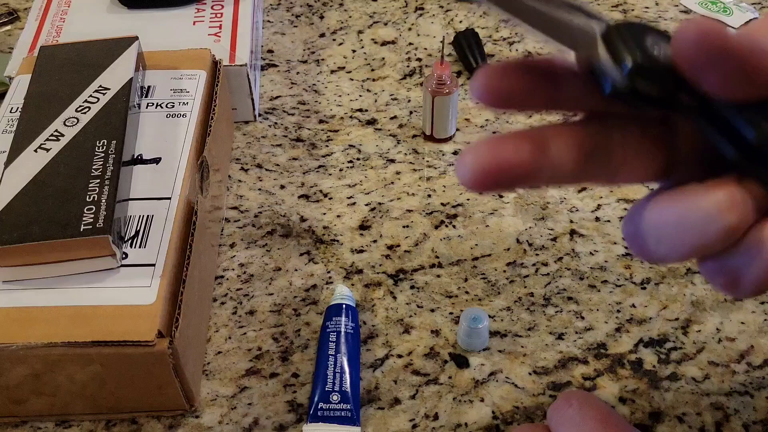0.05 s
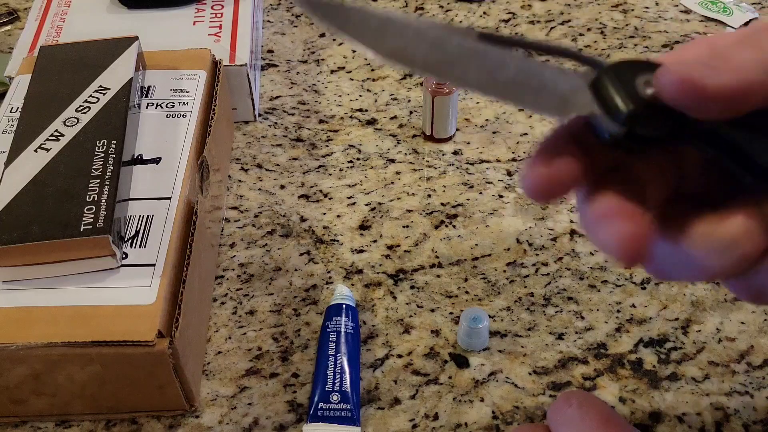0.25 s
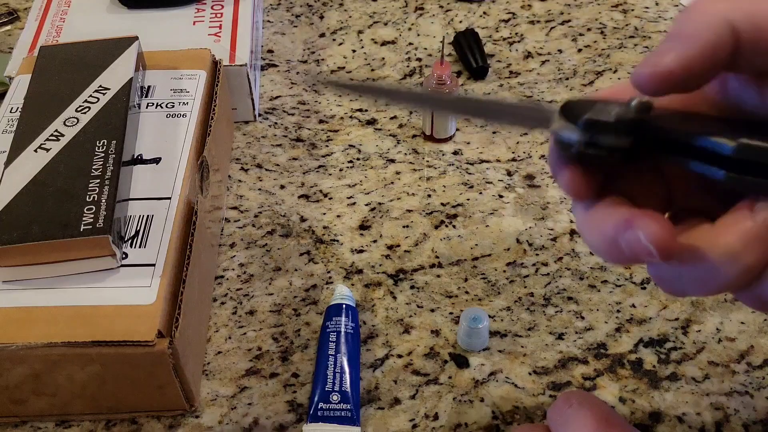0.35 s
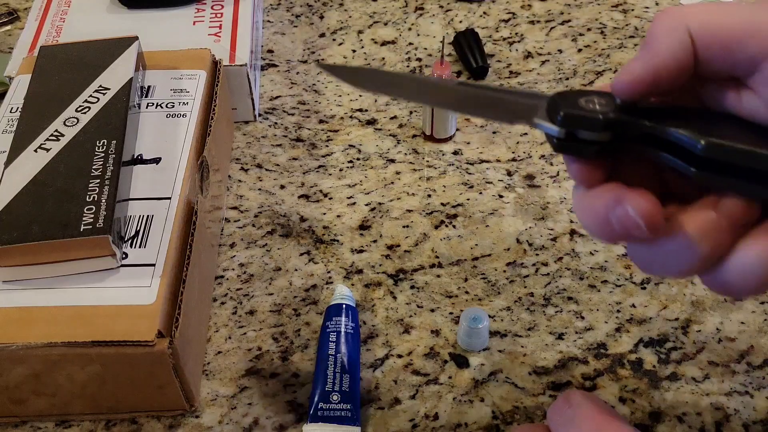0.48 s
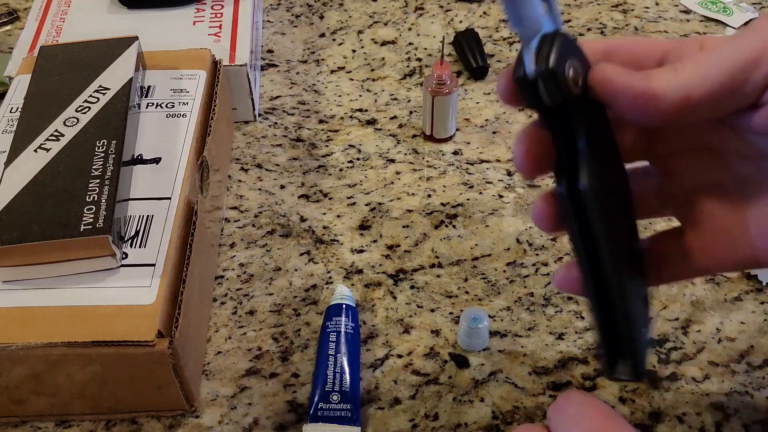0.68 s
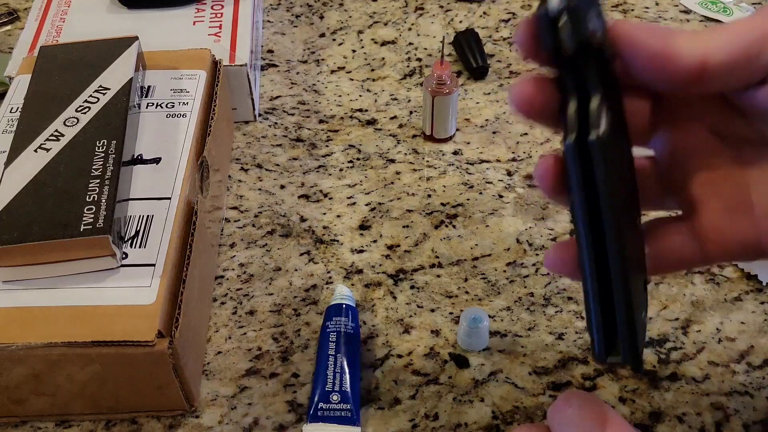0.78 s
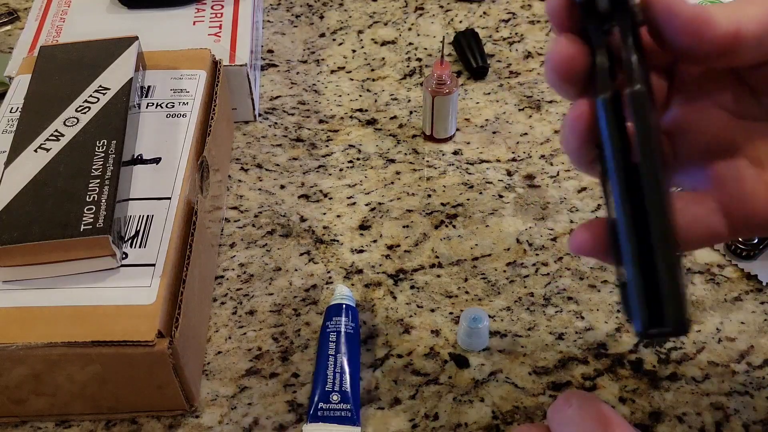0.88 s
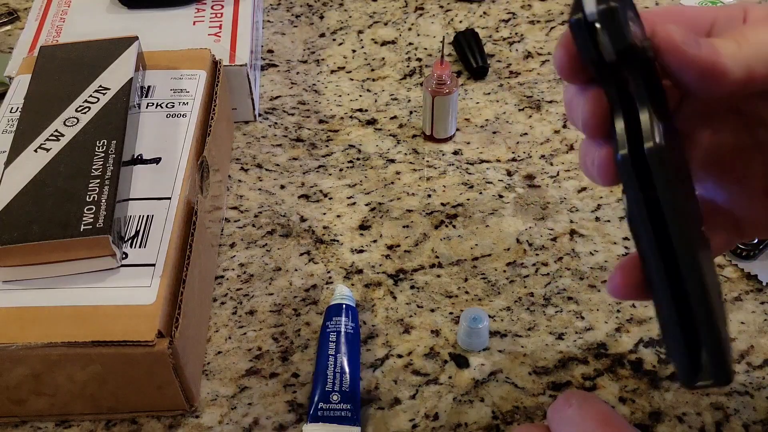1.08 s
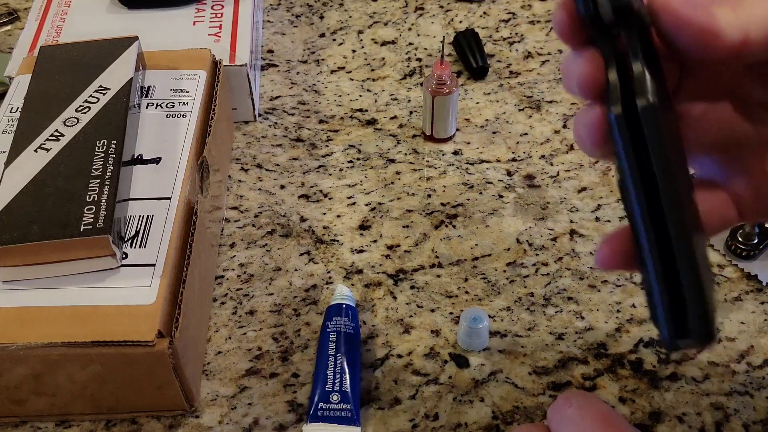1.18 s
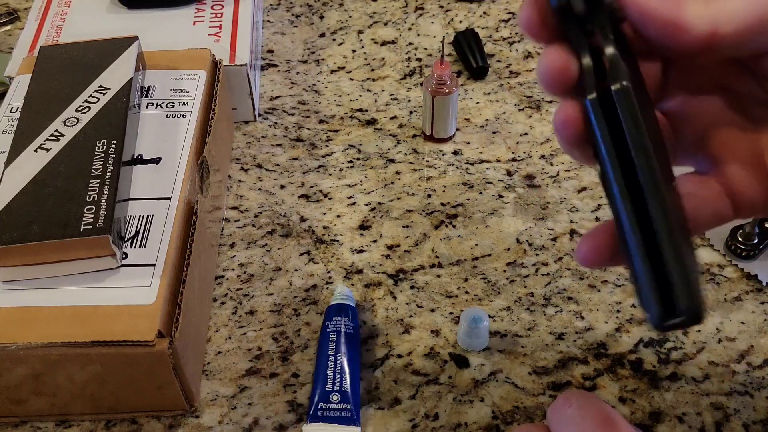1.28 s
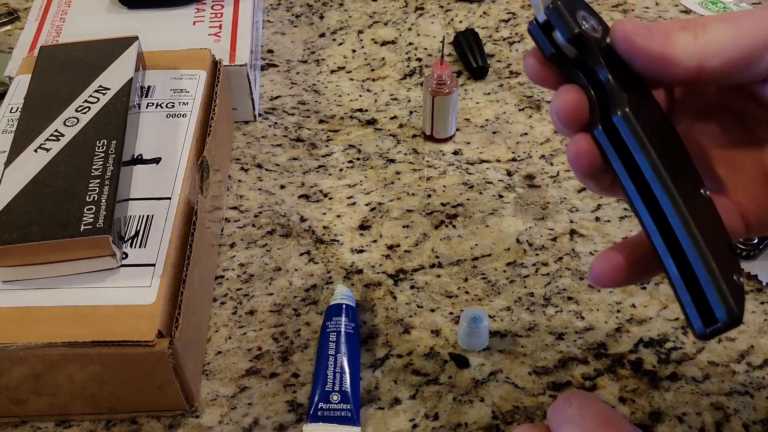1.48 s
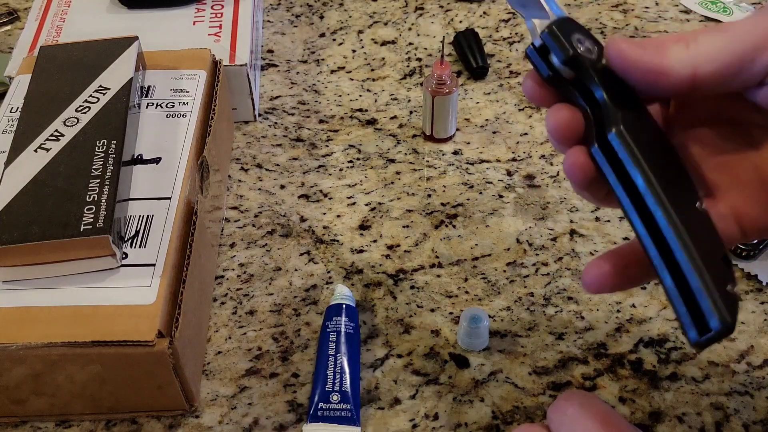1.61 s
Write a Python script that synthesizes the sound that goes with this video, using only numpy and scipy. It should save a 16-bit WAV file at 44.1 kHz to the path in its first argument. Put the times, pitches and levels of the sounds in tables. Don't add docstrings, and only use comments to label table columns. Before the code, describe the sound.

Sharp steel clack of a pocket knife blade locking open, ringing briefly in a hard room

```python
import sys
import numpy as np
from scipy import signal
from scipy.fft import rfft, irfft, next_fast_len
from scipy.io import wavfile
from scipy.ndimage import map_coordinates

SR = 44100
rng = np.random.default_rng(int(sys.argv[2]) if len(sys.argv) > 2 else 0)


def invert_db(x):
    u = np.asarray(x, float) / 20
    return 10 ** u


def wav_record(signal):
    frames = np.transpose(np.atleast_2d(signal))
    bounded = np.clip(frames, -1, 1)
    quanta = np.round(bounded * 32767).astype(np.int16)
    wavfile.write(sys.argv[1], SR, quanta)


N = 72765
T = np.arange(N) / SR

# (f/Hz, level/dB rms)
HUM_TONES = [(60, -69), (79.6, -62), (99.6, -67), (191, -68), (498.5, -67.5)]
# (f/Hz, level/dB per Hz)
RUMBLE_SPECTRUM = [(15, -45.5), (25, -18.5), (86, 0.5), (145, -9.5), (372, -8.5), (428, -14.5), (499, -10),
                   (556, -15), (1000, -28), (1300, -67), (2200, -120)]
# (f/Hz, level/dB per Hz)
HISS_SPECTRUM = [(590, -31), (1000, -4), (1340, -6), (2230, -18.5), (2980, -13.5), (3230, -17), (7190, -31),
                 (12700, -30), (16000, -30.5)]
# (f/Hz, likeness 0 to 1)
LIKENESS = [(60, 1), (180, 1), (550, 0.57), (1650, 0.085), (4970, 0.02), (15000, 0.02)]

# (t/s, level/dB)
SWING_LEVEL = [
    (.133, -78),
    (.137, -47.5),
    (.147, -51.5),
    (.158, -50),
    (.169, -39.5),
    (.18, -47),
    (.205, -54.5),
    (.222, -57.5),
    (.231, -54),
]
# (f/Hz, width/Hz, level/dB)
SCRAPE_MODES = [(1730, 420, -17), (2980, 130, -5.5), (3865, 500, -15.5), (5600, 1200, -14.5),
                (8500, 2000, -20), (12300, 1600, -21.5)]
# (t/s, peak level/dB, f/Hz, t60/s, left over right/dB)
STEEL_TICKS = [(.1368, -43, 5900, .02, 4), (.1368, -43, 2950, .025, -4), (.1428, -22, 6100, .012, 5),
               (.1428, -31, 3000, .015, -6), (.1428, -38, 3750, .012, -2), (.163, -36, 5700, .02, 4),
               (.165, -38, 2950, .02, -3), (.1681, -25, 5900, .016, 2), (.1678, -33, 8400, .012, 0),
               (.172, -34, 6200, .015, 3), (.186, -46, 7240, .15, -3), (.2218, -48, 12200, .014, -24),
               (.217, -46, 6100, .06, -12), (.217, -42, 2900, .1, 4), (.2205, -36, 2900, .1, 7),
               (.724, -72, 6110, .05, -8), (.722, -76, 5470, .06, -8), (.726, -74, 4320, .04, -8)]

# (f/Hz, t60/s)
ROOM_DECAY = [(300, .3), (1000, .35), (2000, 0.24), (3000, 0.41), (4200, .4), (5300, 0.3), (8000, .3),
              (15000, .2)]
# (f/Hz, width/Hz, level/dB)
LINGERING = [(1900, 500, -8.5), (2980, 73, -2), (3700, 100, -6), (4329, 150, -12), (5300, 350, -10),
             (7570, 2500, -20), (13000, 6100, -14.5)]
# (f/Hz, level/dB)
WALL_COLOUR = [(500, -13.5), (1500, 3), (2900, -5), (5300, -4.5), (8500, -9), (9000, -12.5), (16000, -2.5)]

# (t/s, level/dB, t60/s)
BLADE_SONG = [
    (.167, -40, .16),
    (.2308, -47, .31),
]
CONTACT_TIMES = [.2268, .2288, .23015, .23068, .23110, .23172, .23238, .2392, .245, .2525]
# (peak level/dB, left over right/dB)
CONTACT_BLOWS = [
    (-28.5, -6.5),
    (-21.5, -5),
    (-9.5, 0),
    (-5, 6.5),
    (-10.5, 1.5),
    (-10.5, -12.5),
    (-14, -11),
    (-20.5, 2),
    (-24.5, 0),
    (-25.5, -4),
]
# (f/Hz, width/Hz, level/dB)
HANDLE_MODES = [(1620, 300, -19.5), (2944, 170, 1.5), (3668, 250, -8.5), (4238, 430, -11), (5160, 330, -2),
                (6030, 200, -10), (6890, 190, -7.5), (6980, 1200, -12.5), (8450, 660, -12.5),
                (10790, 350, -21), (12443, 650, -17), (14470, 500, -15), (14900, 560, -16)]
# (f/Hz, level/dB, t60/s)
HAND_THUDS = [(1300, -19.5, .006), (850, -37, 0.0054), (537, -40.5, 0.028), (367, -50.5, .025)]
# (f/Hz, level/dB, t60/s)
BLADE_MODES = [(1577, -44.5, .12), (3690, -48.5, 0.42), (6350, -41.5, .1)]

# (t/s, level/dB, length/s)
GRIP_SHIFTS = [(0.529, -84.5, 0.029), (0.587, -86, 0.023), (0.722, -83, 0.031), (0.78, -86, 0.018),
               (1.42, -91.5, .015)]
# (f/Hz, width/Hz, level/dB)
SKIN_COLOUR = [(3030, 280, 0), (5570, 3000, -1), (8200, 1900, 5), (13300, 5000, -3)]
# (t/s, level/dB)
SLIDE_LEVEL = [(.68, -105), (.70, -84), (.715, -72), (.722, -70.5), (.731, -64), (.742, -80), (.77, -92),
               (.79, -85), (.81, -113)]
# (f/Hz, width/Hz, level/dB)
GRIP_MODES = [(2940, 120, -4.5), (4320, 93, -2.5), (5470, 36, -1.5), (6110, 62, -0.5), (8200, 300, -18.5),
              (12840, 5000, -32.5)]

TICK_RISE_S = .0008


def unit(x):
    return x / np.sqrt(np.mean(x ** 2) + 1e-20)


def along(points, hz):
    f, value = np.transpose(points)
    return np.interp(np.log(hz + 1), np.log(f + 1), value)


def level_over_time(points, before_db, after_db):
    return invert_db(np.interp(T, *np.transpose(points), left=before_db, right=after_db))


def wobble(rate):
    knots = rng.standard_normal(int(N * rate / SR) + 4)
    return map_coordinates(knots, [T * rate])


def filtered(x, response):
    size = next_fast_len(N + SR // 2)
    spectrum = rfft(x, size) * response(np.fft.rfftfreq(size, 1 / SR))
    return irfft(spectrum, size)[..., :N]


def body(peaks):
    def response(f):
        total = 0
        for k, (centre, width, db) in enumerate(peaks):
            damping = 1j * f * width
            total = total + (-1) ** k * invert_db(db) * damping / (centre ** 2 - f ** 2 + damping)
        return total
    return response


def ring(s, db, hz, t60, rise):
    t = np.maximum(T - s, 0)
    return invert_db(db - 60 * t / t60) * np.sin(2 * np.pi * hz * t) * (1 - np.exp(-t / rise))


def ports(x, pan_db):
    return x * invert_db(np.array([[.5], [-.5]]) * pan_db)


def left_late(pair, lag_s):
    lags = lag_s * np.array([[1], [0]])
    return filtered(pair, lambda hz: np.exp(-2j * np.pi * hz * lags))


def background():
    sway_db, drift = 1.2, .3
    out = 0
    for hz, db in HUM_TONES:
        level = np.sqrt(2) * invert_db(db + sway_db * wobble(2.3))
        phase = 2 * np.pi * hz * T + 6 * rng.random() + drift * wobble(2.7)
        out = out + level * np.sin(phase)
    for spectrum, db in ((RUMBLE_SPECTRUM, -61), (HISS_SPECTRUM, -79.5)):
        def mid_and_side(hz):
            turn = np.arccos(np.clip(along(LIKENESS, hz), -1, 1)) / 2
            return invert_db(along(spectrum, hz)) * [np.cos(turn), np.sin(turn)]
        mid, side = filtered(rng.standard_normal((2, N)), mid_and_side)
        out = out + invert_db(db) * unit(np.array([mid + side, mid - side]))
    return ports(out, -3.5)


def pivot_scrape():
    grit_db, grit_rate, apart = 3, 900, 1.1
    rustle_db = -86.5
    grit = invert_db(grit_db * wobble(grit_rate))
    a, b = rng.standard_normal((2, N)) * grit
    pair = np.array([a + apart * b, a - apart * b])
    return unit(filtered(pair, body(SCRAPE_MODES))) * level_over_time(SWING_LEVEL, rustle_db, -140)


def room(x):
    room_db, first_wall_s, late_db, late_longer = -4.5, .004, -15, 3.1
    hz, t, z = signal.stft(rng.standard_normal((2, 2, SR)), SR, nperseg=256)
    fall_db = -60 * t / along(ROOM_DECAY, hz)[:, None]
    near = z[0] * invert_db(fall_db)
    far = z[1] * invert_db(late_db + fall_db / late_longer) * np.abs(body(LINGERING)(hz))[:, None]
    tail = signal.istft(near + far, SR, nperseg=256)[1]
    tail = tail / np.linalg.norm(tail[0])
    late = np.pad(x, (round(first_wall_s * SR), 0))[None]
    wet = signal.fftconvolve(late, tail, axes=1)[:, :N]
    return filtered(wet, lambda f: invert_db(room_db + along(WALL_COLOUR, f)))


def ticks():
    return sum(ports(ring(*tick, TICK_RISE_S), pan_db) for *tick, pan_db in STEEL_TICKS)


def blade_song():
    return [ring(s, db, 9435, t60, TICK_RISE_S) for s, db, t60 in BLADE_SONG]


def lock():
    crack_db, crack_t60, low_cut_hz, peak_db = -19.5, .0055, 500, -.4
    hit = filtered((T == 0).astype(float), body(HANDLE_MODES))
    hit = hit / np.abs(hit).max()
    out = np.zeros((2, N))
    for s, (db, pan_db) in zip(CONTACT_TIMES, CONTACT_BLOWS):
        bright_noise = np.diff(rng.standard_normal(N + 1))
        crack = invert_db(crack_db - 60 * T / crack_t60) * bright_noise
        start = round(s * SR)
        out[:, start:] += ports(invert_db(db) * (hit + crack), pan_db)[:, :N - start]
    out = filtered(out, lambda hz: (1j * hz / (low_cut_hz + 1j * hz)) ** 2)
    return invert_db(peak_db) * out / np.abs(out).max()


def thud():
    blow_s = CONTACT_TIMES[3]
    return sum(ring(blow_s, db, hz, t60, .0003) for hz, db, t60 in HAND_THUDS + BLADE_MODES)


def shuffle():
    swell = sum(invert_db(db) * np.exp(-((T - s) / length) ** 2) for s, db, length in GRIP_SHIFTS)
    return swell * unit(filtered(rng.standard_normal((2, N)), body(SKIN_COLOUR)))


def finger():
    rub = unit(filtered(rng.standard_normal((2, N)), body(GRIP_MODES)))
    return ports(rub * level_over_time(SLIDE_LEVEL, -140, -140), -8.5)


def scene():
    lock_lag_s, catch_lag_s = .000315, .00017
    small_room_db = -6.5
    small = pivot_scrape() + ticks() + finger()
    catch_song, lock_song = blade_song()
    snap, dull = lock(), thud()
    direct = left_late(snap + lock_song, lock_lag_s) + left_late(small + dull + catch_song, catch_lag_s)
    into_room = snap.mean(axis=0) + invert_db(small_room_db) * (small.mean(axis=0) + dull)
    return direct + room(into_room) + background() + shuffle()


def roll_off(x):
    return signal.sosfilt(signal.butter(12, 17020, fs=SR, output="sos"), x)


def record(dry):
    top_hz, steepness = 16250, 60
    mix = filtered(dry, lambda hz: 1 / (1 + (hz / top_hz) ** steepness))
    return roll_off(mix)


dry = scene()
out = record(dry)
wav_record(out)
```